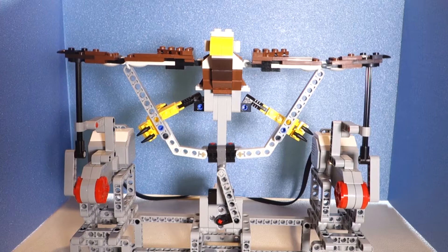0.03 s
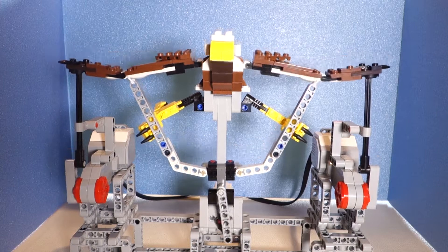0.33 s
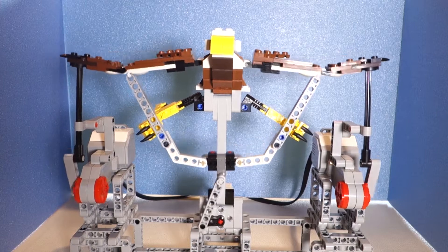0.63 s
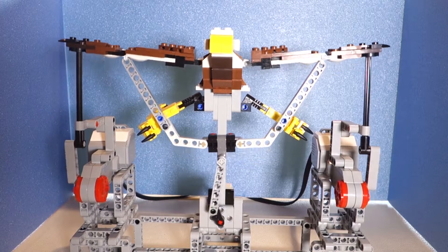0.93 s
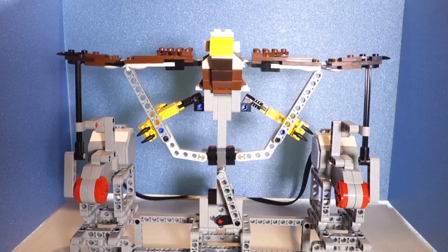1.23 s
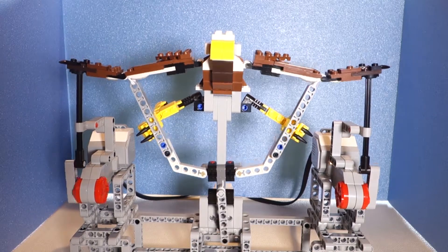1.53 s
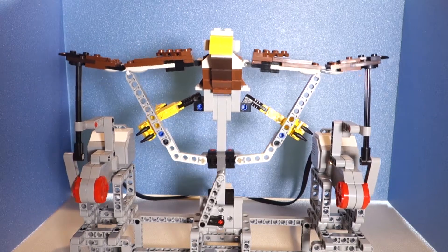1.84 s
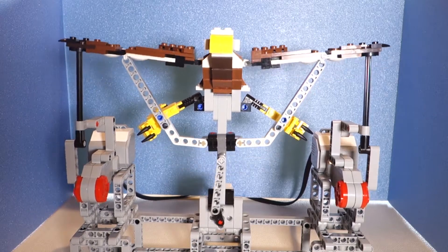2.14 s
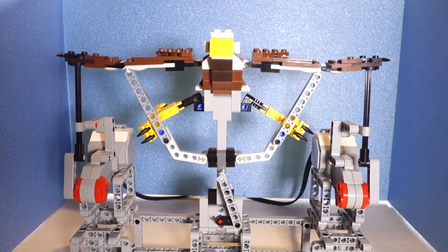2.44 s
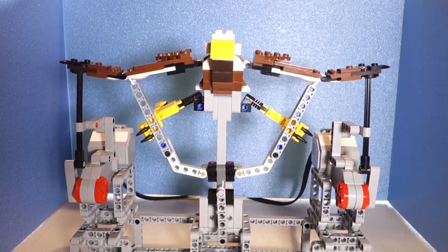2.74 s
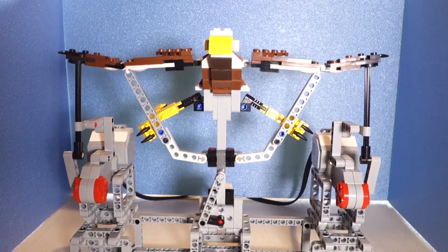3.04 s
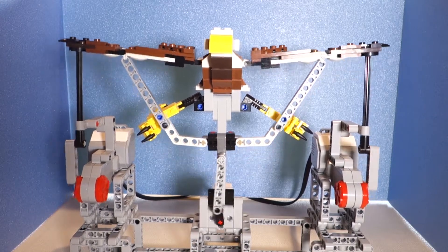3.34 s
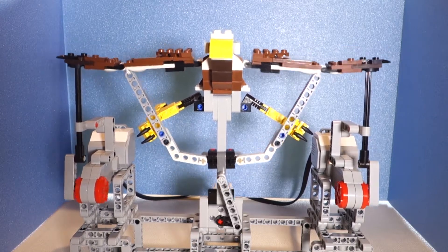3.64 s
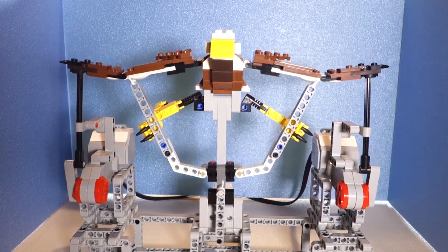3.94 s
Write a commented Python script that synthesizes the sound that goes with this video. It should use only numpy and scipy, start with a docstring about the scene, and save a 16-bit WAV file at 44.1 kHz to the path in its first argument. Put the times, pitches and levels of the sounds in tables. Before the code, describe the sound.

A small electric motor whirs close by, driving the rattling plastic gears of a wing-flapping toy. About once a second the gears slow, grind harder and squeal, with thin scrapes, scattered clicks and a very short echo.

```python
"""A motorised toy flaps its wings

A small electric motor drives plastic gears, close by. Once a wingbeat the load builds: the gears
slow down, grind harder and sing in the resonances of the housing. Teeth rattle throughout, a joint
scrapes twice a beat and loose parts click. Small hard walls nearby add a very short echo."""
import sys
import numpy as np
from scipy import signal
from scipy.fft import rfft, irfft, next_fast_len
from scipy.io import wavfile
from scipy.ndimage import map_coordinates

SR = 44100
rng = np.random.default_rng(int(sys.argv[2]) if len(sys.argv) > 2 else 0)


def transcribe(signal):
    """Save signal, clipped to [-1, 1], as a 16-bit WAV file at the path in sys.argv[1]."""
    frames = np.atleast_2d(signal).T
    limited = np.clip(frames, -1, 1)
    pcm = np.round(limited * 32767).astype(np.int16)
    wavfile.write(sys.argv[1], SR, pcm)


N = 176400
TIME = np.arange(N) / SR
TEETH = 30  # tooth contacts in one turn of the shaft
FREE_HZ, LOADED_HZ = 42.53, 40.25  # shaft turns a second with no load and with full load


def amp(db):
    """Turn decibels into a gain."""
    return 10 ** (np.asarray(db) / 20)


def unit(x):
    """Scale a signal to an average strength (rms) of 1."""
    return x / np.sqrt(np.mean(x ** 2) + 1e-20)


def along(points, hz):
    """Read (f/Hz, value) rows at hz, on a log frequency axis."""
    f, values = np.transpose(points)
    return np.interp(np.log(hz + 1), np.log(f + 1), values)


def curve(rows):
    """Join (t/s, value) rows with straight lines, one value per sample."""
    return np.interp(TIME, *np.transpose(rows))


def swell(s, width_s):
    """A bell-shaped rise and fall, highest at time s."""
    return np.exp(-((TIME - s) / width_s) ** 2 / 2)


def wobble(rate):
    """A smooth curve through rate random values a second."""
    at = np.arange(0, N + 64, 64)
    values = rng.standard_normal(int(N * rate / SR) + 4)
    return np.interp(np.arange(N), at, map_coordinates(values, [at * rate / SR]))


# Uneven pressure of off-centre wheels: cycles per shaft turn, swing/dB
OFF_CENTRE = [(1 / 3, 1.0), (1, 1.9), (2, .8), (3, 1.1), (4, .6), (7, .6), (10, .7)]
def swing(turns):
    """How hard the off-centre wheels press the teeth together, in dB."""
    return sum(db * np.cos(2 * np.pi * cycles * turns) for cycles, db in OFF_CENTRE)


def contacts(turns, worn_db, chance_db, jitter, off_centre, count=TEETH):
    """Teeth hit count times a turn. Each has its own size and timing, and chance varies both."""
    k = np.arange(int(turns[-1] * count))
    own_shift, own_size = rng.standard_normal((count, 2))[k % count].T
    chance_shift, chance_size = rng.standard_normal((len(k), 2)).T
    at_turn = (k + jitter * (chance_shift + own_shift / 2)) / count
    sizes = amp(worn_db * own_size + chance_db * chance_size + off_centre * swing(at_turn))
    hits = np.bincount(np.interp(at_turn, turns, np.arange(N)).astype(int), sizes, N)
    return unit(hits - hits.mean())


# "Mid" is the sound both ears share; "side" is what differs between left and right.
# Peaks and dips of the plastic housing: f/Hz, width/Hz, mid boost/dB, side boost/dB
RESONANCES = [(124, 32, 3.5, -7), (233, 37, 6, -1), (365, 10, 12, 3), (423, 27, 6.5, 1),
              (1560, 140, -1, 16.5), (2014, 110, 3.5, 15.5), (2772, 145, 6, -16), (3485, 310, 4.5, 17.5),
              (3950, 210, 5.5, -9), (4447, 270, 4.5, 14), (5360, 110, -0.5, 7), (5130, 150, -6.5, 0),
              (5710, 180, 1, 11), (7110, 850, 3.5, -2), (8350, 340, 6.5, 2), (9870, 560, 5, 12),
              (10780, 750, 3, 8)]
# Stereo width, side against mid: f/Hz, level/dB
STEREO_WIDTH = [(30, -4), (130, -23), (500, -11), (1200, -13), (2400, -28), (3200, -12), (4300, -11.5),
                (6300, -4), (7700, 5.5), (9500, -4.5), (12000, 2), (15500, 4)]
def housing(hits, spectrum, scatter_s, facing=1, size=4096):
    """Hits ring the housing and scatter through the frame; the sign of facing picks the leading ear."""
    hz, t = np.fft.rfftfreq(size, 1 / SR), np.arange(size) / SR
    db = along(spectrum, hz) + np.array([0 * hz, along(STEREO_WIDTH, hz)])
    for centre, width, mid_db, side_db in RESONANCES:
        db = db + np.outer([mid_db, side_db], np.exp2(-(2 * (hz - centre) / width) ** 2))
    # Folding the cepstrum (minimum phase) makes the ringing follow the hit.
    cepstrum = irfft(np.log(amp(db[0])))
    cepstrum[1:size // 2] *= 2
    cepstrum[size // 2 + 1:] = 0
    paths = rfft(rng.standard_normal(size) * amp(-60 * t / scatter_s))
    phase = np.exp(1j * (rfft(cepstrum).imag + np.angle(paths)))
    lead = size // 8
    mid, side = np.roll(irfft(amp(db) * phase * [[1], [1j * facing]]), lead, axis=1)
    ring = np.array([mid + side, mid - side]) / np.linalg.norm(mid)
    return signal.oaconvolve(hits[None], ring, axes=1)[:, lead:lead + N]


def stray_ticks(per_s=190, spread_db=2.5):
    """Slack between the teeth (backlash) makes ticks at random moments."""
    when, size = rng.random((int(per_s * N / SR), 2)).T
    return unit(np.bincount((when * N).astype(int), amp(spread_db * np.sqrt(12) * size), N))


# Tone colour of the rattle, ticks and grinding before the housing: f/Hz, level/dB
RATTLE_COLOUR = [(30, -35), (100, -46), (250, -30), (500, -35.5), (1000, -9.5), (2200, -5), (3200, -5.5),
                 (6300, 0.5), (7700, -3), (11000, -5), (13000, -8.5), (15700, -18.5)]
TICK_COLOUR = [(100, -32), (500, -13.5), (1500, -2), (3500, 2.5), (6000, -1), (8000, -2.5), (11000, -0.5),
               (15500, -19.5)]
GRIND_COLOUR = [(100, -36), (600, -22.5), (1200, -14.5), (2200, -6), (3200, -1.5), (5600, -0.5), (7000, -8),
                (9000, -35.5), (15000, -34)]
# How hard the teeth grind; each sound scales the swings around USUAL_GRIND_DB: t/s, level/dB
GRIND_EFFORT = [(0.12, -25.5), (0.32, -26.5), (0.67, -22), (1.02, -24.5), (1.49, -26), (1.79, -22),
                (2.19, -24), (2.71, -25.5), (2.79, -23), (3.08, -21.5), (3.35, -23.5), (3.78, -25),
                (4.0, -23.5)]
USUAL_GRIND_DB = -24
def gears(turns, facing, grind_growth=2.08):
    """Half of the gears: a bright rattle, stray ticks and darker grinding that swells each wingbeat."""
    light = contacts(turns, worn_db=1.8, chance_db=1.8, jitter=.3, off_centre=.6)
    heavy = contacts(turns, worn_db=1.2, chance_db=1.8, jitter=.25, off_centre=.55)
    rattle = housing(light, RATTLE_COLOUR, scatter_s=.0069, facing=facing)
    ticks = housing(stray_ticks(), TICK_COLOUR, scatter_s=.0034, facing=facing)
    grind = housing(heavy, GRIND_COLOUR, scatter_s=.01, facing=facing)
    swell_db = grind_growth * (curve(GRIND_EFFORT) - USUAL_GRIND_DB)
    return amp(-26.5) * rattle + amp(-30.5) * ticks + amp(-28 + swell_db) * grind


# Notes of thin plastic parts: f/Hz, level/dB, dB gained per dB of grinding effort
THIN_PARTS = [(4540, -41, 0.5), (5400, -31.5, 1.2), (5700, -37, 0.9), (8340, -40, -1), (10020, -43, -1)]
def chatter(turns, ring_s=.024, lag_s=.07):
    """Six knocks a turn ring thin parts. Just after hard grinding, low notes swell and high ones dip."""
    t = np.arange(SR // 16) / SR
    effort_db = curve(np.add(GRIND_EFFORT, [lag_s, 0])) - USUAL_GRIND_DB
    ear_phase = np.array([[.35], [-.35]])
    out = np.zeros((2, N))
    for hz, db, growth in THIN_PARTS:
        knocks = contacts(turns, worn_db=.5, chance_db=2, jitter=.15, off_centre=1.1, count=6)
        ring = np.diff(np.cos(2 * np.pi * hz * t + ear_phase) * amp(-60 * t / ring_s), prepend=0)
        ringing = unit(signal.oaconvolve(knocks[None], ring, axes=1)[:, :N])
        out += amp(db + growth * effort_db) * ringing
    return out


# Loudness of the shaking frame, before boost_db: t/s, level/dB
FRAME_SHAKE = [(0.12, -47.5), (1.0, -50.5), (2.11, -50), (2.38, -45), (3.19, -50.5), (3.4, -46)]
# Its tone colour before the housing: f/Hz, level/dB
RUMBLE_COLOUR = [(25, -24), (60, -6), (110, -10.5), (170, -3), (260, -3.5), (400, -1), (700, 0), (1100, -4),
                 (2200, -15), (6000, -62)]
def rumble(turns, boost_db=.5):
    """The teeth shake the frame into a low rumble that rises and falls."""
    shake = contacts(turns, worn_db=2, chance_db=2.5, jitter=.77, off_centre=.34)
    return amp(curve(FRAME_SHAKE) + boost_db) * housing(shake, RUMBLE_COLOUR, scatter_s=.016)


def tone(turns, multiple, flutter_db, waver_rad):
    """A slightly unsteady stereo note at a multiple of the shaft speed."""
    phase = 2 * np.pi * multiple * turns + waver_rad * wobble(45)
    level = np.sqrt(2) * unit(amp(flutter_db * wobble(35)))
    side = amp(along(STEREO_WIDTH, multiple * FREE_HZ)) * np.sin(phase + .62 * wobble(3.9))
    return level * (np.cos(phase) + np.outer([1, -1], side))


# Swells in the note of the motor's small gear: peak t/s, width/s, level/dB
MOTOR_GEAR_SWELLS = [(0.4, .07, -41), (0.95, .08, -37), (1.6, .11, -40), (1.96, .02, -38), (2.13, .05, -36),
                     (2.43, .06, -43), (2.68, .05, -39), (2.84, .04, -39), (3.33, .07, -38),
                     (3.95, .08, -38.5)]
# Gear overtones, before boost_db: multiple of shaft speed, no-load level/dB, full-load level/dB
OVERTONES = [(10, -59, -61), (20, -58, -52), (33, -60, -47), (40, -46.5, -44), (50, -54, -46),
             (60, -52, -41), (70, -42, -41), (80, -45, -41.5), (90, -51, -40.5), (93, -45, -45),
             (100, -55, -40.5), (110, -46, -35), (113, -51, -34), (131, -43, -46), (133, -54, -35)]
def whine(turns, load, steady_db=-46, boost_db=.5):
    """The motor's gear sings a rough note; most overtones rise as load pulls them into resonance."""
    level = amp(steady_db) + sum(amp(db) * swell(s, width) for s, width, db in MOTOR_GEAR_SWELLS)
    roughness = unit(amp(.7 * swing(turns)))
    out = level * roughness * tone(turns, TEETH, flutter_db=1.6, waver_rad=.2)
    for multiple, free_db, loaded_db in OVERTONES:
        overtone = tone(turns, multiple, flutter_db=3, waver_rad=.3)
        out += amp(boost_db + free_db + load * (loaded_db - free_db)) * overtone
    return out


# Gear squeals, loudest under heavy load: start t/s, end t/s, level/dB
SQUEAL_TIMES = [(0.505, 0.7, -27.5), (0.718, 0.755, -29), (1.14, 1.3, -37), (1.59, 1.68, -37),
                (1.73, 1.915, -27.5), (2.85, 2.962, -27.5), (2.998, 3.112, -27), (3.925, 3.97, -31)]
def squeal(turns, attack_s=.026, release_s=.009):
    """One gear overtone squeals where the slowing shaft draws it into a resonance of the housing."""
    level = np.zeros(N)
    for start, end, db in SQUEAL_TIMES:
        rise = 1 - np.exp(-np.maximum(TIME - start, 0) / attack_s)
        fall = np.exp(-np.maximum(TIME - end, 0) / release_s)
        level += amp(db) * rise * fall
    grip = unit(amp(1.1 * swing(turns) + 1.5 * wobble(170)))
    return level * grip * tone(turns, multiple=70, flutter_db=1, waver_rad=.4)


# Scrapes of the joint, two each wingbeat: peak t/s, level/dB
SCRAPE_TIMES = [(.59, -25.5), (1.11, -31.5), (1.70, -26.5), (2.25, -31.5), (2.91, -26.5), (3.46, -32)]
# Their tone colour before the housing: f/Hz, level/dB
SCRAPE_COLOUR = [(2000, -41), (6600, -22), (6950, -5), (7300, -23), (14000, -38)]
def scrapes(turns):
    """A joint slips in time with the teeth and rings at one high pitch, swelling and fading."""
    level = sum(amp(db) * swell(s, width_s=.052) for s, db in SCRAPE_TIMES)
    slips = contacts(turns, worn_db=2, chance_db=2.5, jitter=.4, off_centre=.9)
    return level * housing(slips, SCRAPE_COLOUR, scatter_s=.0087)


# Blows of loose parts, before boost_db: t/s, level/dB
CLICK_TIMES = [(0.5984, -11), (0.647, -7), (0.7215, -2), (1.0368, -15), (2.1364, -12), (2.2087, -3.5),
               (2.2822, -4), (2.4258, -3.5), (3.309, -8), (3.38, -8), (3.669, -3)]
# Their tone colour before the housing: f/Hz, level/dB
CLICK_COLOUR = [(200, -28), (1200, 0), (3500, 12), (6000, 2), (10000, -25), (15000, -8)]
def clicks(boost_db=3):
    """Loose links click as their slack is taken up."""
    blows = np.zeros(N)
    for s, db in CLICK_TIMES:
        blows[round(s * SR)] = amp(db + boost_db)
    return housing(blows, CLICK_COLOUR, scatter_s=.0056)


def room(sound, ring_s=.14):
    """Close hard walls throw back a short, bright echo."""
    t = np.arange(SR // 4) / SR
    tail = rng.standard_normal((2, len(t))) * amp(-60 * t / ring_s)
    echo = signal.fftconvolve(sound, tail / np.linalg.norm(tail[0]), axes=1)[:, :N]
    return signal.sosfilt(signal.butter(2, 2500, "high", fs=SR, output="sos"), echo)


# Turns a second of the gear shaft, dipping once a wingbeat: t/s, f/Hz
SHAFT_SPEED = [(0.11, 42.9), (0.27, 41.5), (0.5, 40.8), (0.6, 40.33), (0.72, 40.11), (0.9, 41.82),
               (1.1, 41.74), (1.6, 40.54), (1.88, 39.96), (2.07, 41.67), (2.41, 41.62), (2.75, 40.72),
               (2.94, 40.16), (3.08, 40.02), (3.26, 41.66), (3.55, 41.62), (3.8, 41.03), (4.0, 40.31)]
def scene():
    """One shaft sets the pace of all the gears; the slower it turns, the heavier the load."""
    speed = curve(SHAFT_SPEED)
    turns = np.cumsum(speed) / SR + .0014 * wobble(32)  # slack in the gears lets the shaft waver
    load = np.clip((FREE_HZ - speed) / (FREE_HZ - LOADED_HZ), 0, 1) ** 1.46
    far_gain = amp(-.5)  # the far half of the gears is a little quieter
    both_halves = gears(turns, facing=1) + far_gain * gears(turns, facing=-1.3)
    clatter = both_halves / np.hypot(1, far_gain) + chatter(turns) + scrapes(turns) + clicks()
    return clatter + amp(-10.5) * room(clatter) + rumble(turns) + whine(turns, load) + squeal(turns)


def record(dry):
    """The sound starts abruptly, and the very highest treble is cut off."""
    start_s, top_hz = .1055, 15850
    size = next_fast_len(N + SR // 2)
    spectrum = rfft(dry * (TIME >= start_s), size)
    return irfft(spectrum * (np.fft.rfftfreq(size, 1 / SR) < top_hz), size)[:, :N]


dry = scene()
out = record(dry)
transcribe(out)
```